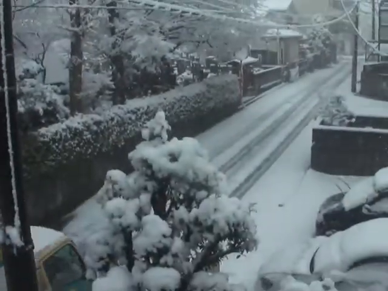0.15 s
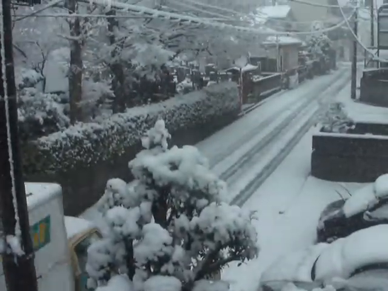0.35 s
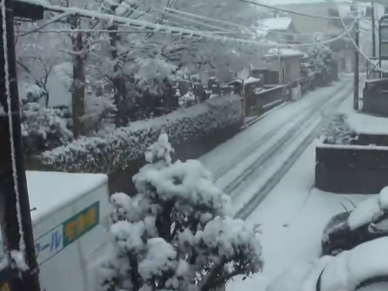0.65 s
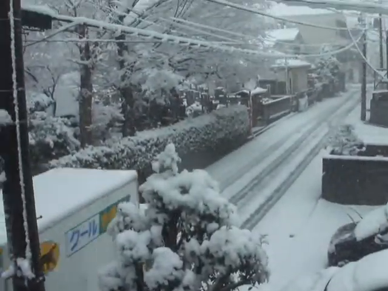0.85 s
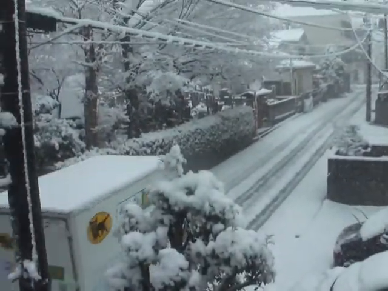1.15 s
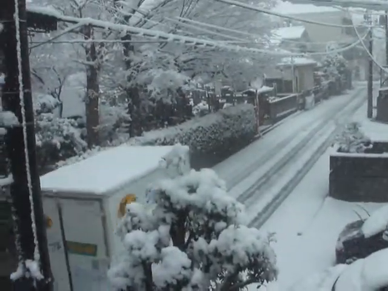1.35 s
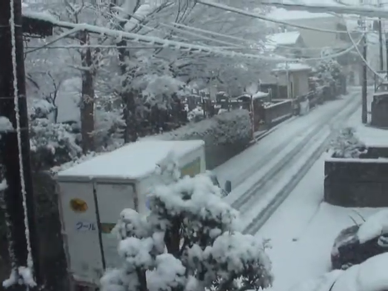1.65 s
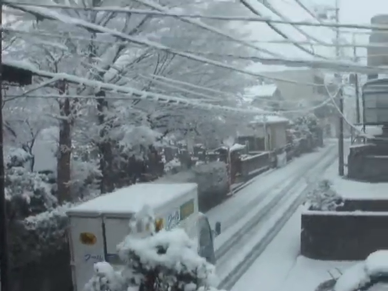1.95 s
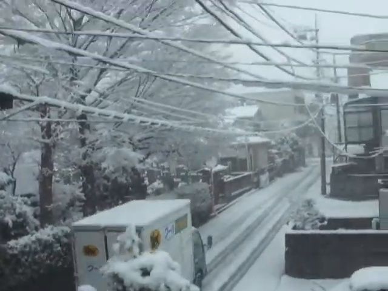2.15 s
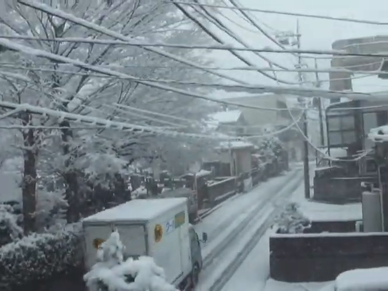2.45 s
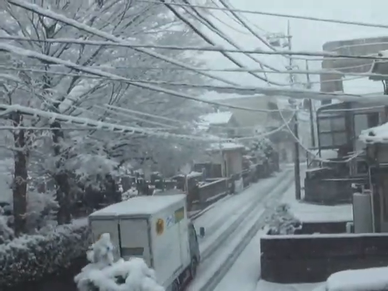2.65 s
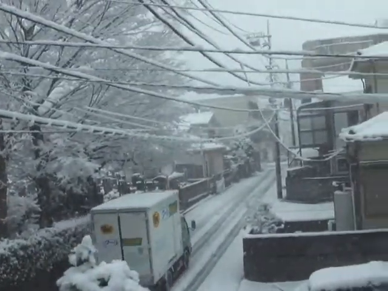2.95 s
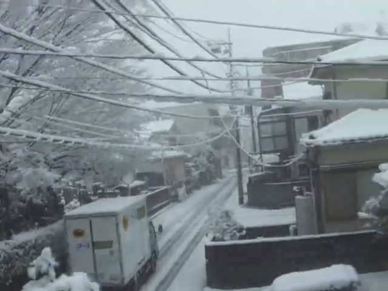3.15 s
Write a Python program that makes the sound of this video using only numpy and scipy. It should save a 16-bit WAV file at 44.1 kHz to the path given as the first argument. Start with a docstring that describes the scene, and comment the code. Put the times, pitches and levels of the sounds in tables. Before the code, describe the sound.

A diesel truck rolls away along a snowy street, heard from an upper floor. Its engine drones and clatters over a muffled crunch of tyres, easing after about 2 seconds into a softer throb. The cargo box knocks dully at the start, near 0.7 and 1.4 seconds, then more lightly until about 3 seconds. A thin hiss runs close to the microphone, with a few faint scuffs, squeaks and clicks.

```python
"""A snowy street, heard from an upper floor through a small camera, as a diesel box truck rolls away.
Periodic firing makes the engine drone, clatter and throb, and brief low tones waver in the noise.
Snow collapses under the tyres with a crunch, and knocks ring the modes of the box now and then.
Close by there is a thin hiss with a few scuffs, squeaks and clicks. The camera favours its right side."""
import sys
import numpy as np
from scipy import signal
from scipy.fft import rfft, irfft, next_fast_len
from scipy.io import wavfile
from scipy.ndimage import uniform_filter1d, map_coordinates

SR = 44100
rng = np.random.default_rng(int(sys.argv[2]) if len(sys.argv) > 2 else 0)


def put_to_file(sound):
    """Save the sound as 16-bit audio at rate SR, in the file named by the first command-line argument."""
    columns = np.atleast_2d(sound).T  # one column per channel
    safe = np.clip(columns, -1, 1)
    whole_steps = np.round(safe * 32767)
    wavfile.write(sys.argv[1], SR, whole_steps.astype(np.int16))


N = 145971

# the running engine (time [s], firing rate [Hz], base level of its tones [dB])
ENGINE_RUN = [(0, 50.3, -57.5), (.9, 50.1, -64), (1.7, 51.54, -62), (2.2, 53.8, -72), (2.7, 54.5, -77),
              (3.31, 55.35, -80)]
# spectrum of the near sounds (frequency [Hz], level [dB])
NEAR_SPECTRUM = [(2000, -3), (3300, -6), (4600, -7), (5500, 3), (6200, 7), (7800, 5.5), (9200, 2.5),
                 (10200, 3), (10650, 7.5), (11100, 1.5), (11600, -12)]


def amp(db):
    """Decibels to amplitude ratio."""
    return 10 ** (np.asarray(db) / 20)


def unit(x):
    """Normalise to rms 1."""
    return x / np.sqrt(np.mean(x ** 2) + 1e-20)


def along(points, hz):
    """Interpolation on a logarithmic frequency axis."""
    f, v = np.transpose(points)
    return np.interp(np.log(hz + 1), np.log(f + 1), v)


def clock():
    """Sample times in seconds."""
    return np.arange(N) / SR


def curves(rows):
    """Linear interpolation in time of each column after the first."""
    times, *columns = np.transpose(rows)
    return [np.interp(clock(), times, column) for column in columns]


def wobble(rate):
    """Smooth random modulation: a spline with rate knots a second."""
    return map_coordinates(rng.standard_normal(1024), [clock() * rate], mode="mirror")


def filtered(x, response):
    """Linear filtering: the spectrum of x times a frequency response."""
    n = x.shape[-1]
    padded = next_fast_len(n + 4096)
    hz = np.fft.rfftfreq(padded, 1 / SR)
    return irfft(rfft(x, padded) * response(hz), padded)[..., :n]


def noise():
    """Uncorrelated white noises. Every source has these two rows: mid and side."""
    return rng.standard_normal((2, N))


def centred(x):
    """A coherent signal: all mid, no side."""
    return np.outer([1, 0], x)


def bell(x):
    """Gaussian curve, x in standard deviations."""
    return np.exp(-.5 * x ** 2)


def grains(per_s, spread_db):
    """Shot noise: random impulses of uneven size."""
    hits = rng.random(N) < per_s / SR
    return unit(hits * noise() * amp(spread_db * rng.standard_normal(N)))


def coloured(x, spectrum):
    """Spectral shaping, at rms 1."""
    return unit(filtered(x, lambda hz: amp(along(spectrum, hz))))


def band(x, centre_hz, octaves):
    """Gaussian band-pass, at rms 1."""
    return unit(filtered(x, lambda hz: bell(np.log2((hz + 1) / centre_hz) / octaves)))


def burst(x, envelope):
    """Windowing, with the energy set by the envelope."""
    y = x * envelope
    return y * np.sqrt(np.sum(envelope ** 2) / (np.sum(y ** 2, axis=1, keepdims=True) + 1e-20))


def patchy(x, depth_db):
    """Random gain in brief, narrow patches of time and frequency."""
    spectra = signal.stft(x, nperseg=2048)[2]
    field = uniform_filter1d(rng.standard_normal(spectra.shape[1:]), size=3, axis=0)
    field = uniform_filter1d(field, size=6, axis=1)
    return unit(signal.istft(spectra * amp(depth_db * unit(field)))[1][:, :N])


def hiss(prickle=0.47, flicker_db=1):
    """Continuous noise plus shot noise gives a thin, prickly hiss."""
    # the hiss (time [s], level [dB])
    hiss_level = [(0, -42.5), (.35, -45), (.5, -42), (.8, -46.5), (1.0, -40), (1.2, -44), (1.45, -42.5),
                  (1.68, -45.5), (1.92, -44), (2.1, -47.5), (2.6, -46), (3.12, -45), (3.31, -42.5)]
    fizz = patchy(noise(), depth_db=2.5) + prickle * grains(per_s=400, spread_db=2)
    return amp(curves(hiss_level)[0] + flicker_db * wobble(30.47)) * coloured(fizz, NEAR_SPECTRUM)


def ticks(t60_s=0.0046):
    """Noise with a sudden onset and fast exponential decay is heard as tiny clicks."""
    # near clicks (time [s], level [dB])
    clicks = [(1.04, -31), (1.788, -27.5)]
    t = clock()
    envelope = sum((t >= s) * amp(db - 60 * np.abs(t - s) / t60_s) for s, db in clicks)
    return envelope * coloured(noise(), NEAR_SPECTRUM)


def scuffs(squeak_octaves=0.028):
    """Friction near the microphones: broadband rubbing with a narrowband squeak."""
    # rubs (time [s], level [dB], Gaussian width [s], squeak [Hz], squeak's share of power [0-1])
    rubs = [(0.041, -29, 0.0069, 10700, 0.45), (0.908, -31.5, 0.0076, 7660, 0.9),
            (0.91, -40, 0.009, 9600, 0.9), (0.959, -36, .01, 10900, 0.6),
            (1.042, -32.5, 0.0022, 6250, 0.05), (1.445, -41.5, 0.023, 10650, 0.75),
            (2.726, -39, .006, 10400, 0.7), (3.016, -40.5, 0.0061, 6700, 0.4),
            (3.247, -35, 0.0088, 10670, 0.89)]
    out = np.zeros((2, N))
    rub = coloured(noise(), NEAR_SPECTRUM)
    for s, db, width, hz, share in rubs:
        squeak = band(noise(), hz, squeak_octaves)
        sound = np.sqrt(1 - share) * rub + np.sqrt(share) * squeak
        out += amp(db) * burst(sound, bell((clock() - s) / width))
    return out


def body(shake_db=1.66):
    """Forced vibration: the shaking truck's resonances swell and fade as it moves on."""
    # resonances (centre [Hz], half-width [Hz], level [dB], peak time [s], fade to either side [dB/s])
    resonances = [(1329, 98, -35.5, 0.85, 2.5), (203, 8.8, -41.5, 3.14, 5), (945, 320, -36.5, 2.86, 3),
                  (761, 103, -32.5, 0.64, 12.5), (347, 18.6, -35.5, 1.42, 9.5), (546, 36, -41.5, 2.1, 3.5)]
    out = np.zeros((2, N))
    for centre, width, db, peak_s, fade in resonances:
        ring = unit(filtered(noise(), lambda hz: 1 / (1 + ((hz - centre) / width) ** 2)))
        out += amp(db - fade * np.abs(clock() - peak_s) + shake_db * wobble(27.2)) * ring
    return out


def brief_tones(waver=0.0098, flutter_db=2.0):
    """Modulation of pitch and level: low tones waver, swell and fade within the truck's noise."""
    # tones (time [s], level [dB], pitch [Hz], Gaussian width [s])
    swells = [(0.188, -30.5, 580, 0.034), (0.247, -26, 301.4, 0.024), (0.4, -34.5, 470, 0.044),
              (0.55, -32.5, 332, 0.081), (0.883, -33, 549, 0.043), (1.21, -38, 387.5, .07),
              (1.485, -28.5, 803, 0.0097), (1.93, -35, 404, .04)]
    out = np.zeros(N)
    for s, db, hz, width in swells:
        pitch = hz * (1 + waver * wobble(30.23))
        note = unit(np.sin(2 * np.pi * np.cumsum(pitch) / SR))
        out += amp(db + flutter_db * wobble(42.5)) * bell((clock() - s) / width) * note
    return centred(out)


def knocks(ringing=0.91, attack_s=0.00069, shudder_t60_s=0.057, box_t60_s=0.039):
    """Impact excitation: each blow gives a dull shudder and rings the damped modes near its band."""
    # blows on the box (time [s], level [dB], centre [Hz])
    blows = [(0.0876, -13, 850), (.127, -16.5, 610), (.169, -21, 406), (.697, -17.5, 635),
             (1.4314, -16, 780), (1.448, -19, 530), (1.551, -23.5, 560), (2.134, -23.5, 476),
             (2.203, -30, 298), (2.277, -26, 272), (2.497, -22.5, 308), (3.0385, -19.5, 980),
             (3.04, -20.5, 332)]
    # modes of the box (frequency [Hz], level [dB])
    box_modes = [(275, -8), (352, 0.5), (560, -3), (705, 0), (985, 3.5)]
    out = np.zeros((2, N + SR))
    t = np.arange(SR // 8) / SR
    attack = 1 - np.exp(-t / attack_s)
    envelope = attack * amp(-60 * t / shudder_t60_s)
    envelope_rms = np.sqrt(np.mean(envelope ** 2))
    lead = SR // 100  # room for the band-pass to spread ahead of the onset
    for s, db, hz in blows:
        jolt = rng.standard_normal((2, len(t))) * envelope
        shudder = band(np.pad(jolt, ((0, 0), (lead, 0))), hz, octaves=0.43)
        modes = 0
        for mode_hz, mode_db in box_modes:
            coupling = bell(np.log2(mode_hz / hz) / 0.6)  # 0.6 octave spread
            modes += amp(mode_db) * coupling * np.sin(2 * np.pi * (mode_hz * t + rng.random()))
        ring = unit(np.pad(modes * attack * amp(-60 * t / box_t60_s), (lead, 0)))
        thud = (shudder + ringing * centred(ring)) / np.hypot(1, ringing)
        onset = round(s * SR)
        out[:, onset - lead:onset + len(t)] += amp(db) * envelope_rms * thud
    return out[:, :N]


def tyres(crunch=0.63, lumps_db=0.6, gain_db=-2):
    """Many small, muffled collapses of snow under the treads add up to noise."""
    # the crunch (time [s], level [dB])
    snow_level = [(0, -25), (.35, -27.5), (.85, -26.5), (1.5, -29), (2.0, -30), (2.55, -32.5), (3.31, -39)]
    # its spectrum (frequency [Hz], level [dB])
    snow_spectrum = [(60, -60), (150, -49), (260, -6), (340, 0), (520, 0), (660, -5), (800, -8.5),
                     (920, -10), (1200, -7.5), (2000, -40)]
    snow = coloured(noise() + crunch * grains(per_s=700, spread_db=4.5), snow_spectrum)
    return amp(curves(snow_level)[0] + gain_db + lumps_db * wobble(34.9)) * snow


def firing_phase(waver=0.0049):
    """Phase is the integral of frequency: one turn for each firing."""
    rate_hz = curves(ENGINE_RUN)[0] * (1 + waver * wobble(7.75))
    return 2 * np.pi * np.cumsum(rate_hz) / SR


def exhaust(phase, gain_db=-4.0, shake_db=1, hum_flutter_db=2, crest_s=2.5):
    """Amplitude modulation: a rumble and a fifth-harmonic hum throb together once in four firings."""
    # the rumble (time [s], level [dB])
    rumble_level = [(0, -34.5), (.2, -32), (.35, -35), (.9, -31), (1.6, -35), (2.25, -32), (3.31, -33.5)]
    # its spectrum (frequency [Hz], level [dB])
    rumble_spectrum = [(20, -52), (60, -45), (85, -22), (120, -19), (150, -8), (200, -4), (240, -5.5),
                       (290, 0), (330, -9), (450, -26), (900, -60)]
    # the hum comes through once the tail faces the house (time [s], level [dB])
    hum_level = [(1.6, -47.5), (2.25, -41), (2.7, -48), (3.31, -35)]
    # the throb deepens as the truck draws away (time [s], swing [dB])
    throb_depth = [(1.2, 1), (2.2, 4.2)]
    cycle = (phase - np.interp(crest_s, clock(), phase)) / 4
    throb_db = curves(throb_depth)[0] * np.cos(cycle)
    rumble_db = curves(rumble_level)[0] + gain_db + throb_db + shake_db * wobble(26.53)
    rumble = amp(rumble_db) * coloured(noise(), rumble_spectrum)
    tone = unit(np.sin(5 * phase + 2 * np.pi * rng.random()))
    hum = amp(curves(hum_level)[0] + throb_db + hum_flutter_db * wobble(22.28)) * tone
    return rumble + centred(hum)


def engine(phase, flutter_db=2.5, pulsing=0.18, clatter_db=0.22, dulling_db_per_s=0.5):
    """Periodic excitation: harmonics of the firing rate, and a clatter that swells with each firing."""
    # engine tones (multiple of the firing rate, level over the base [dB])
    harmonics = [(1, 3.5), (2, 0), (3, 11.5), (4, 14)]
    # the clatter (time [s], level [dB])
    clatter_level = [(0, -31), (.27, -30), (.7, -33), (1.25, -31), (1.7, -33), (2.3, -38.5), (2.9, -39),
                     (3.31, -39.5)]
    # its spectrum (frequency [Hz], level [dB])
    clatter_spectrum = [(100, -56), (500, 0), (950, -8.5), (1200, -6), (1520, 0), (1800, 1), (2100, -1),
                        (2400, -7), (2700, -12.5), (2950, -25.5), (3400, -29), (4600, -31), (6000, -43)]
    base_db = curves(ENGINE_RUN)[1]
    tones = np.zeros(N)
    for k, db in harmonics:
        gain = amp(base_db + db + flutter_db * np.sqrt(k) * wobble(7.18))
        tones += gain * np.sin(k * phase + 2 * np.pi * rng.random())
    pulses = patchy(noise(), depth_db=2.0) * (1 + pulsing * np.cos(phase))
    clatter = coloured(pulses, clatter_spectrum)
    # directivity: the treble above 2 kHz fades as the truck turns its back
    treble = filtered(clatter, lambda hz: 1 - 1 / (1 + (hz / 2000) ** 20))
    treble_db = 1.06 - dulling_db_per_s * clock()
    clatter += treble * (amp(treble_db) - 1)
    return np.sqrt(2) * centred(tones) + amp(curves(clatter_level)[0] + clatter_db) * clatter


def microphones(pair, left_lead_s=2.2e-5):
    """Two close ports lose coherence in the treble; the right is louder, the left slightly early."""
    # gain of the side signal (frequency [Hz], level [dB])
    side_gain = [(40, -12), (100, -17), (170, -23), (500, -23), (1000, -19), (1800, -15), (2500, -12),
                 (3300, -7.5), (6000, -6), (11000, -4)]
    # left relative to right (frequency [Hz], level [dB])
    balance = [(100, -7.5), (600, -6), (1250, -6), (1900, -3.5), (2500, -4), (3500, -2), (5500, -3.5),
               (7300, -6), (11000, -6.5)]
    mid = pair[0]
    side = filtered(pair[1], lambda hz: amp(along(side_gain, hz)))
    half = np.array([[.5], [-.5]])

    def ports(hz):
        return amp(half * along(balance, hz)) * np.exp(2j * np.pi * hz * half * left_lead_s)
    return filtered(np.array([mid + side, mid - side]), ports)


def scene():
    """Superposition of the truck and the near sounds at the two microphones."""
    phase = firing_phase()
    truck = engine(phase) + exhaust(phase) + body() + brief_tones() + tyres() + knocks()
    return amp(0.78) * microphones(truck + hiss() + scuffs() + ticks())


def record(dry):
    """Filters in cascade: the camera's three notches, bass roll-off and band limit."""
    # notch filters (centre [Hz], half-width [Hz])
    notches = [(3020, 140), (4020, 227), (5020, 180)]
    low_cut_hz, top_hz = 73, 11700

    def response(hz):
        dips = [1 - np.exp(-((hz - centre) / width) ** 2) for centre, width in notches]
        low_cut = 1 - np.exp(-(hz / low_cut_hz) ** 2)
        return np.prod(dips, axis=0) * low_cut * (hz < top_hz)
    return filtered(dry, response)


dry = scene()
out = record(dry)
put_to_file(out)
```